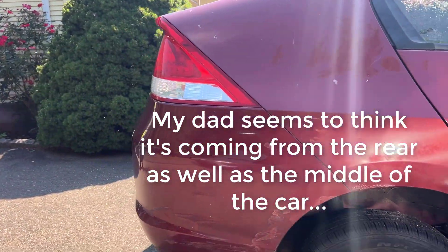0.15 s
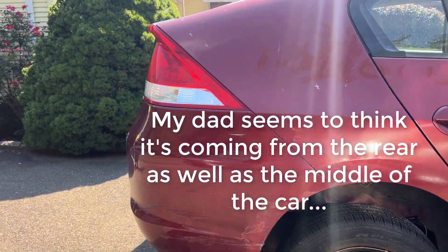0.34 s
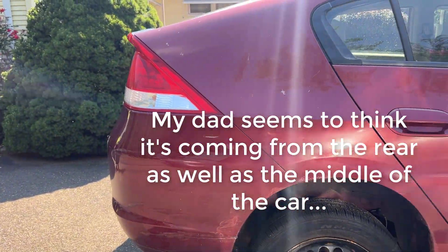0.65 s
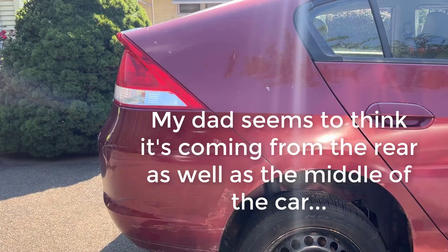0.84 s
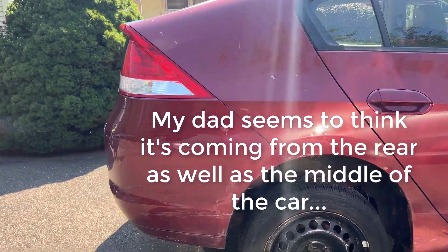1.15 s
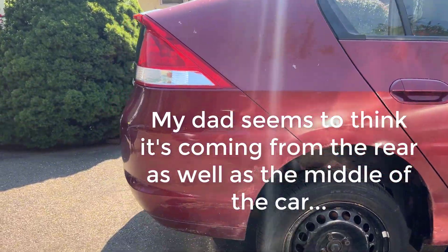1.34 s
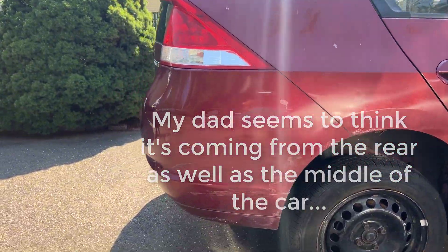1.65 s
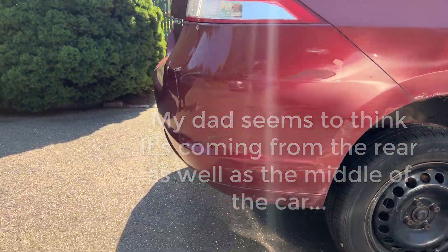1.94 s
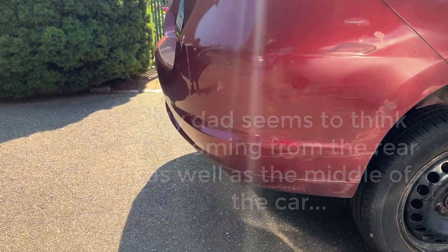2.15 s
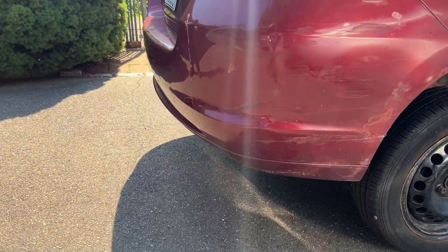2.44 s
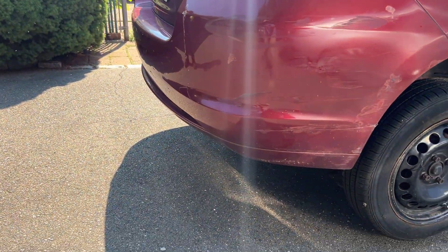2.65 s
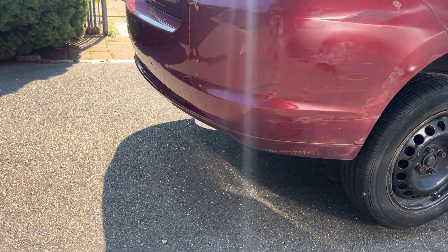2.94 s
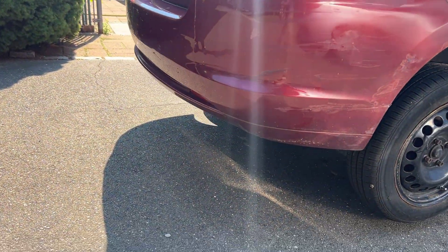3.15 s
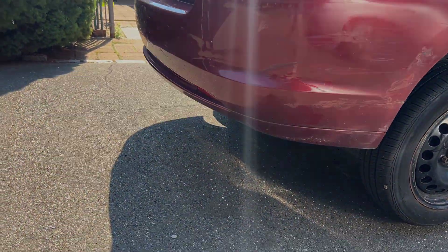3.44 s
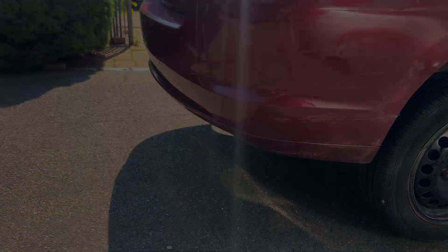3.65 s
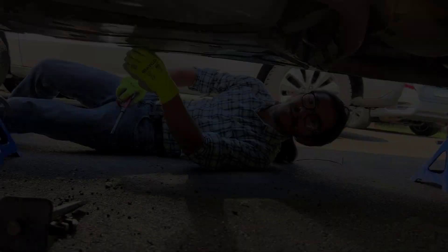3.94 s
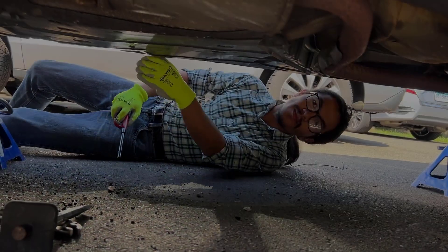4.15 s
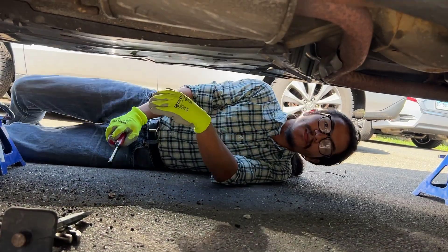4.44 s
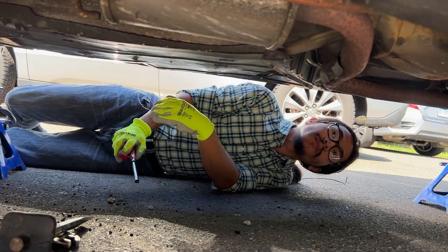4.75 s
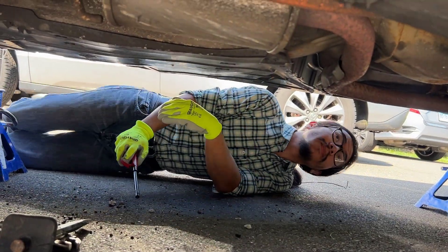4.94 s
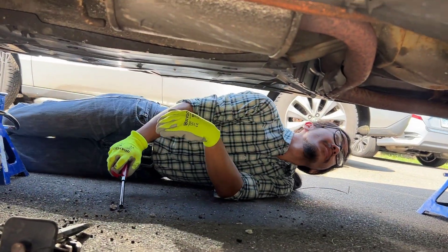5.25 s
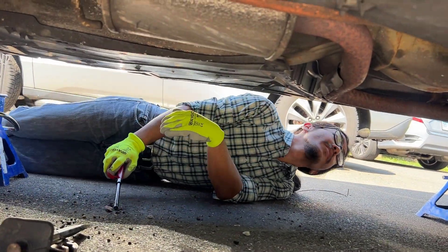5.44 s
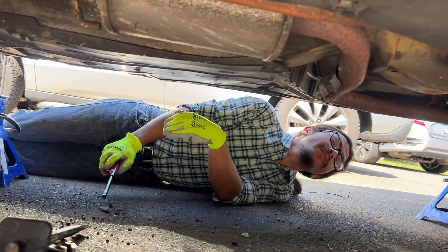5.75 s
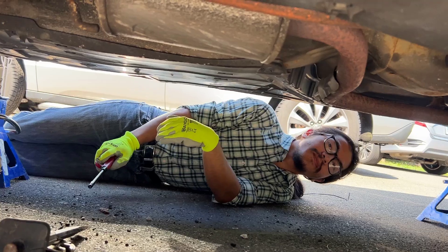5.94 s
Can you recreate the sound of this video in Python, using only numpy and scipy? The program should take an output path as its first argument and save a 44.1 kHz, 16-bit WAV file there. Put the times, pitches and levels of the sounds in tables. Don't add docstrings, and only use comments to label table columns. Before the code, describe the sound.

Outdoors, close beside the tail of a small car, a holed exhaust drones at a fast steady idle, each firing cracking and puffing. A handheld microphone moves behind the bumper, with dull footstep bumps and faint shoe scrapes on asphalt. The sound fades gradually to nothing near four seconds, then the same idle fades up from underneath, closer, brighter and hissier.

```python
import sys
import numpy as np
from scipy import signal
from scipy.fft import rfft, irfft, next_fast_len
from scipy.io import wavfile
from scipy.ndimage import uniform_filter1d

SR = 44100
rng = np.random.default_rng(int(sys.argv[2]) if len(sys.argv) > 2 else 0)


def master_out(mix):
    frames = np.transpose(np.atleast_2d(mix))
    ceiling = np.clip(frames, -1, 1)
    pcm = np.round(ceiling * 32767).astype(np.int16)
    wavfile.write(sys.argv[1], SR, pcm)


def undo_db(level):
    steps = np.asarray(level, float) / 20
    return 10 ** steps


N = 268304
TIME = np.arange(N) / SR

# t/s, rate/firings per s
SPEED_BESIDE = [(0, 36.772), (.3, 36.137), (.7, 34.931), (1.2, 34.723), (4.05, 34.162)]
SPEED_UNDER = [(3.8, 32.221), (4.9, 32.339), (5.3, 31.832), (6.1, 31.917)]
# level/dB, change by the end of the walk/dB, change with revs/dB per firing/s above idle
LAYERS_BESIDE = dict(drone=(-17.5, 0.33, 0.35), growl=(-32, -0.58, 0.95), rasp=(-13, 4.7, -0.47),
                 roar=(-42, -0.57, -0.2), hiss=(.1, -0.88, 0.22))
LAYERS_UNDER = dict(drone=(-12, 0, -1.9), growl=(-22, 0, 0.26), rasp=(-10.5, 0, -0.24), roar=(-37, 0, 1),
                hiss=(.1, 0, 0.45))
STRONG_BESIDE = {2: (-10.5, 5.9, 2.6), 3: (-6, .1, .1), 4: (-3.23, -3, -0.27), 5: (-7.5, -2, -1.45)}
STRONG_UNDER = {2: (-5.5, 0, 5), 3: (-3.5, 0, .1), 4: (-9.5, 0, 5.6), 5: (-8.5, 0, 3.3)}
# order/multiple of firing rate, level/dB
WHOLES_BESIDE = [(1, -23), (6, -23), (7, -17), (8, -16), (9, -22), (10, -27), (11, -19), (12, -28),
                 (13, -25), (14, -30), (16, -36), (17, -42), (18, -38), (19, -44)]
WHOLES_UNDER = [(1, -27), (6, -18), (7, -14), (8, -10), (9, -21), (11, -20), (13, -19), (14, -34),
                (15, -33), (16, -24), (17, -25), (19, -40), (20, -32), (21, -38)]
# order/multiple of firing rate, level/dB
HALVES_BESIDE = [(.5, -42), (1.5, -20), (2.5, -17), (4.5, -26), (7.5, -34), (10.5, -22), (12.5, -33),
                 (20.5, -48)]
HALVES_UNDER = [(.5, -40), (2.5, -22), (6, -31), (8.5, -22), (12.5, -25), (16.5, -33), (17.5, -40),
                (20.5, -40)]
# order/multiple of firing rate, change/dB
TURNING = [(4.5, -1), (6.5, -8), (8.5, 0), (11, 3), (12.5, -4), (16, 10), (18, 15), (21, 6)]
PATHS_BESIDE = [(.214, -1, .1), (.635, -1, .1), (.8, -.96, .1), (.838, .71, .1)]
PATHS_UNDER = [(0, -1.6, .16), (.365, -1.0, .04)]
# f/Hz, level/dB, change by the walk/dB, t60/s, side share/ratio, delay/periods
SHELL_BESIDE = [(943, -1.5, -11.5, 0.084, 0.13, .75), (1150, -6, -18, 0.053, 0.24, 0.93),
                (2000, -5, -21.5, 0.032, 0.39, 0.8), (1537, -22.5, 18.5, 0.031, .6, 0.9),
                (847, -11.5, -11, 0.023, 0.35, 1), (1407, -17, -8, 0.042, .4, 0.91),
                (1788, -20, -10, 0.067, .4, .85), (765, -19, 22, 0.046, .3, .8)]
SHELL_UNDER = [(1270, 1, 0, .04, .7, .28), (1862, -6, 0, .03, 1.5, .22), (2146, -7, 0, .03, .7, .22),
               (2600, -1, 0, .005, .6, .22), (1600, 0, 0, .006, .5, .24), (930, -6, 0, .02, .6, .28),
               (1627, -7, 0, .035, 1.5, .25), (1390, -7, 0, .03, .7, .27)]
# f/Hz, level/dB
MID_BESIDE = [(350, -36), (600, -11.5), (940, -2.5), (1340, -13), (2010, -13.5), (3500, -21.5), (8300, -28),
              (11500, -33), (15500, -26)]
MID_BEHIND = [(350, -19), (600, -4), (690, -10.5), (1510, -18), (3000, -23), (6580, -29.5), (11300, -38),
              (15500, -34)]
SIDE_BESIDE = [(120, -29), (200, -11.5), (380, -2.5), (690, -11), (940, -11), (2290, -22), (7100, -32),
               (11200, -36), (15500, -29)]
MID_UNDER = [(350, -32), (600, -24), (780, -9), (1000, -11.5), (1250, -6), (1500, -11.5), (2200, -11),
             (3300, -14), (8400, -19.5), (11800, -24.5), (15500, -15.5)]
SIDE_UNDER = [(120, -18), (200, -2), (360, -3.5), (1070, -15.5), (1450, -13), (1700, -10), (2330, -19),
              (7350, -26), (11800, -28.5), (15500, -20.5)]
# t/s, position/0 facing the flank to 1 behind the bumper
WALK = [
    (1.4, 0.058),
    (1.9, 0.34),
    (2.5, 0.92),
    (3.0, 0.92),
]
# t/s, level/dB
NEARNESS = [(0, -2), (.1, -0.2), (.6, 0.1), (1.1, -0.06), (1.6, -0.6), (2.0, -0.5), (2.4, 0.2), (3.2, -0.1),
            (3.9, 0.5)]
# t/s, peak level/dB, length/s
SCUFFS = [
    (0.644, -51, 0.05),
    (1.101, -48, 0.013),
    (2.064, -54, 0.006),
    (2.535, -52, 0.006),
    (2.764, -48.5, 0.037),
    (2.799, -41, 0.0044),
    (2.812, -46, 0.017),
    (2.832, -46.5, 0.026),
    (2.839, -42.5, 0.011),
    (2.85, -49.5, .04),
]
# t/s, peak level/dB, f/Hz
THUDS = [
    (.37, -31, 60),
    (0.581, -20, 92),
    (1.198, -11, 60.4),
    (1.29, -33, 64.6),
    (1.602, -21, 95),
    (1.851, -25, 64.6),
]
# f/Hz, level/dB per bin
DROPPED_MID = [(3000, -120), (8600, -99), (9300, -86.5), (9700, -70), (10450, -56), (10900, -88.5),
               (11400, -99), (13000, -102), (14300, -99), (15300, -89), (15800, -51)]
DROPPED_SIDE = [(3000, -120), (6500, -100), (7300, -94), (8200, -102), (12200, -100), (12700, -79),
                (13100, -60), (14000, -58), (14500, -86), (15300, -89.5), (15800, -53)]


def engine(speed, fired, idle, layers, strong, orders, paths, shell, colours,
           roar, hiss, crack_db, rebound, side_db, bunch, ports):
    turns = firings(speed, fired)
    above = in_time(speed)[0] - idle
    walk = np.clip(in_time(WALK)[0], 0, 1)
    level = {name: db + walk_db * walk + rev_db * above for name, (db, walk_db, rev_db) in layers.items()}
    order_db = {k: db + walk_db * np.minimum(2.1 * walk, 1) + rev_db * above
                for k, (db, walk_db, rev_db) in strong.items()}
    note, growl = drone(turns, orders, paths, order_db, walk, level["growl"], level["rasp"], bunch)
    blow = gas(turns, walk, colours, roar, hiss, level["hiss"], side_db, ports)
    leak = undo_db(crack_db) * crack(turns, shell, walk, rebound)
    shake = rumble(level["drone"], walk) * [[1], [.3]]
    return undo_db(level["drone"]) * note + growl + undo_db(level["roar"]) * (blow + leak) + shake


def firings(speed, fired):
    return fired + np.cumsum(np.interp(TIME, *np.transpose(speed), left=0, right=0)) / SR


def order_rows(wholes, halves, turning):
    rows = []
    for k in np.arange(1, 43) / 2:
        db = np.interp(k, *np.transpose(halves if k % 1 else wholes))
        rows.append((k, db, turning * np.interp(k, *np.transpose(TURNING))))
    return rows


def drone(turns, orders, paths, order_db, walk, growl_db, rasp_db, bunch):
    note, growl, rasp, side = np.zeros((4, N))
    on = np.diff(turns, prepend=turns[0]) > 0
    shakes = drift(10.5, count=9)[:, on]
    for i, (k, db, change_db) in enumerate(orders):
        whole = k % 1 == 0
        lag = np.angle(sum(g * np.exp(-k * (dull + 2j * np.pi * late)) for late, g, dull in paths))
        if not whole or k > 9:
            late, scatter = bunch if k > 12.8 and whole else (0, np.pi)
            lag = scatter * rng.uniform(-1.1, 1) - 2 * np.pi * k * late
        uneven = 1 if whole else 2.5
        swell, wobble = shakes[i % 9], shakes[(i * 4 + 3) % 9]
        gain = undo_db(db + change_db * walk[on] + .22 * uneven * np.sqrt(k) * swell)
        angle = 2 * np.pi * k * turns[on] + lag + .014 * uneven * k * wobble
        if k in order_db:
            note[on] += undo_db(order_db[k][on] + 3.0 + 0.5 * swell) * np.cos(angle)
        elif k < 5.6:
            note[on] += gain * undo_db(-7.0) * np.cos(angle)
        else:
            layer = growl if k < 12.8 else rasp
            layer[on] += gain * np.cos(angle)
            side[on] += gain * np.sqrt(k) * np.cos(angle + 1.26 + rng.uniform(-0.6, 0.84))
    growl, rasp, side = [x / np.sqrt(uniform_filter1d(x ** 2, size=16001) + 1e-9) for x in (growl, rasp, side)]
    note_side = (0.08 - 0.026 * np.sin(np.pi * walk)) * note
    upper = np.array([growl + undo_db(rasp_db + 2.0) * rasp, undo_db(-10.5) * side])
    return np.array([note, note_side]), undo_db(growl_db) * upper


def crack(turns, shell, walk, rebound):
    mid, side = np.zeros(N), np.zeros(N)
    early = .006 * rng.standard_normal(200)[(turns + .45).astype(int)]
    for hz, db, change_db, t60, share, late in shell:
        fired = np.diff(np.floor(turns - late + early), prepend=np.inf) > 0
        clicks = fired * undo_db(db + change_db * walk + 1.0 * rng.standard_normal(N))
        clicks[150:] += rebound * clicks[:-150]
        rung = ring(clicks, hz, t60)
        mid += rung
        side += share * rung
    return np.array([mid, side])


def gas(turns, walk, colours, roar, hiss, hiss_db, side_db, ports):
    white, flicker = rng.standard_normal((2, N)), drift(17.0, count=3)
    turned = np.imag(signal.hilbert(white[0], next_fast_len(N)))[:N]
    white[1] = ports * turned + np.sqrt(max(1 - ports ** 2, 0)) * white[1]
    hiss_puff = puff(turns, *hiss)
    low = band(white, 140, 2370) * puff(turns, *roar) * undo_db(.5 * flicker[0])
    middle = band(white, 2440, 7900) * hiss_puff ** 0.34 * undo_db(hiss_db + 1.0 * flicker[1])
    high = band(white, 6860, 14000) * hiss_puff * undo_db(hiss_db + 0.99 * flicker[2])
    mid, side = low + middle + high
    first, last, wide = [rms_one(colour(x, c)) for x, c in zip((mid, mid, side), colours)]
    return np.array([first + walk * (last - first), undo_db(side_db) * wide])


def puff(turns, start, rise, fall, depth):
    part, count = np.modf(turns - start + 1)
    strength = undo_db(1.2 * rng.standard_normal(200))[count.astype(int)]
    return 1 + depth * strength * (1 - np.exp(-part * rise)) * np.exp(-part * fall)


def steps():
    grit, thud = np.zeros(N), np.zeros(N)
    for s, db, length in SCUFFS:
        half = length / 2
        grit += undo_db(db) * np.exp(-((TIME - s - half) / half) ** 2)
    grains = rng.standard_normal((2, N)) * undo_db(2.5 * np.minimum(rng.exponential(1, (2, N)), 4))
    for s, db, hz in THUDS:
        thud += ring(undo_db(db) * (np.arange(N) == round(s * SR)), hz, .2)
    return grit * rms_one(band(grains, 1200, 6800)) + band(thud, 35, 190) * [[1], [.15]]


def rumble(drone_db, walk):
    under = rms_one(band(rng.standard_normal(N), 30, 220)) * undo_db(drone_db - 23 + 3 * drift(3)[0])
    shaking_db = drone_db - 16.5 - 6.3 * walk + 4.3 * drift(8.8)[0]
    return under + rms_one(band(rng.standard_normal(N), 29, 119)) * undo_db(shaking_db)


def thin(x, dropped):
    hz, _, frames = signal.stft(x[101:], SR, "cosine", nperseg=2048, noverlap=1024)
    power = np.abs(frames[:1024].reshape(64, 16, -1)) ** 2
    level_db = 10 * np.log10(np.mean(power, axis=1) + 1e-20)
    limit_db = np.interp(hz[8:1024:16], *np.transpose(dropped))[:, None]
    limit_db = limit_db + 5.0 * rng.standard_normal(level_db.shape)
    limit_db[:38] += uniform_filter1d(level_db[12:24].mean(axis=0), size=9) + 86.5
    frames[:1024] *= np.repeat(level_db > limit_db, 16, axis=0)
    back = signal.istft(frames, SR, "cosine", nperseg=2048, noverlap=1024)[1]
    return np.concatenate([x[:101], back])[:N]


def rms_one(x):
    return x / np.sqrt(np.mean(x ** 2) + 1e-20)


def in_time(rows):
    s, *columns = np.transpose(rows)
    return [np.interp(TIME, s, c) for c in columns]


def drift(rate, count=1):
    r = np.exp(-128 * np.pi * rate / SR)
    noise = rng.standard_normal((count, N // 64 + 2001))
    slow = signal.lfilter([1], [1, -2 * r, r * r], noise)[:, 2000:]
    slow = slow / slow.std(axis=1, keepdims=True)
    return uniform_filter1d(np.repeat(slow, 64, axis=1)[:, :N], size=64)


def colour(x, points):
    size = next_fast_len(N)
    hz, db = np.transpose(points)
    bins_hz = np.arange(size // 2 + 1) * SR / size
    gain = undo_db(np.interp(np.log(bins_hz + 1), np.log(hz), db))
    return irfft(rfft(x, size) * gain, size)[:N]


def band(x, low_hz, high_hz):
    return signal.sosfilt(signal.butter(3, [low_hz, high_hz], "band", fs=SR, output="sos"), x)


def ring(clicks, hz, t60):
    r, w = undo_db(-60 / (t60 * SR)), 2 * np.pi * hz / SR
    return signal.lfilter([0, np.sin(w)], [1, -2 * r * np.cos(w), r * r], clicks + 1e-18)


def scene():
    beside = engine(SPEED_BESIDE, 8.049, 34.7, LAYERS_BESIDE, STRONG_BESIDE,
                    order_rows(WHOLES_BESIDE, HALVES_BESIDE, 0.92), PATHS_BESIDE, SHELL_BESIDE,
                    (MID_BESIDE, MID_BEHIND, SIDE_BESIDE),
                    roar=(0.74, 23.0, 6.8, 0.37), hiss=(0.52, 14, 1.7, 1.5), crack_db=6.5,
                    rebound=0.46, side_db=2.0, bunch=(.8, 3.1), ports=0.88)
    under = engine(SPEED_UNDER, 3.225, 31.9, LAYERS_UNDER, STRONG_UNDER,
                   order_rows(WHOLES_UNDER, HALVES_UNDER, 0), PATHS_UNDER, SHELL_UNDER,
                   (MID_UNDER, MID_UNDER, SIDE_UNDER),
                   roar=(0.21, 22.3, 3.3, 1.69), hiss=(0.094, 14.6, 8.2, 3.7), crack_db=5.5,
                   rebound=0.16, side_db=4.5, bunch=(.445, .6), ports=-0.62)
    going = np.clip((3.906 - TIME) / 2.9, 0, 1)
    coming = np.clip((TIME - 3.893) / 3.18, 0, 1) * (TIME > 3.9515)
    walked = beside * undo_db(in_time(NEARNESS)[0]) + steps()
    mid, side = walked * going + under * coming
    return np.array([mid + side, mid - side])


def low_pass(x):
    return signal.sosfilt(signal.butter(12, 15850, fs=SR, output="sos"), x)


def record(dry):
    left, right = dry
    mid = thin((left + right) / 2, DROPPED_MID)
    side = thin((left - right) / 2, DROPPED_SIDE)
    return low_pass(np.array([mid + side, mid - side]))


dry = scene()
out = record(dry)
master_out(out)
```